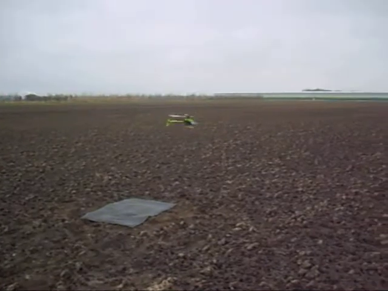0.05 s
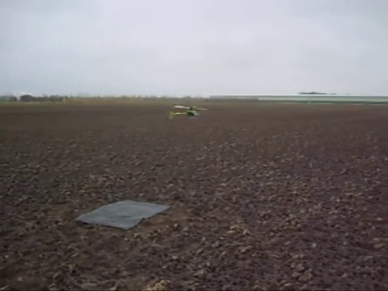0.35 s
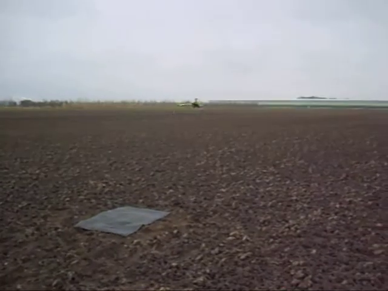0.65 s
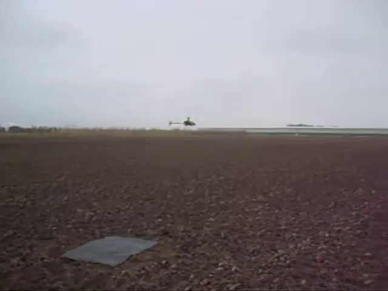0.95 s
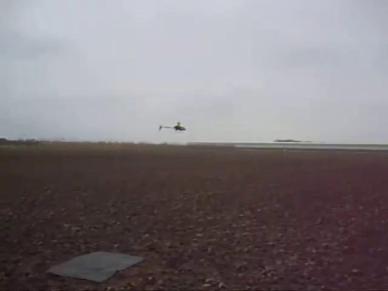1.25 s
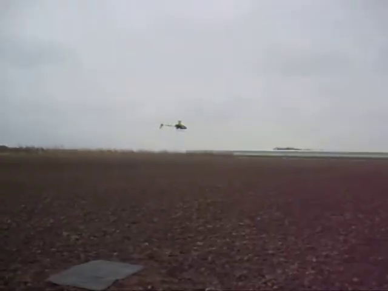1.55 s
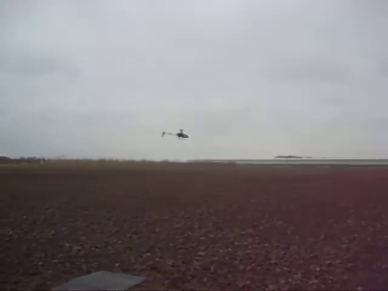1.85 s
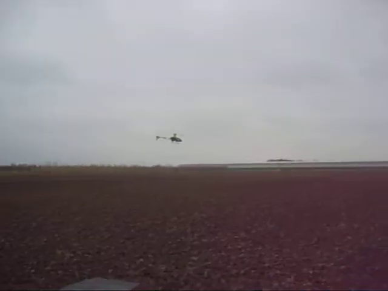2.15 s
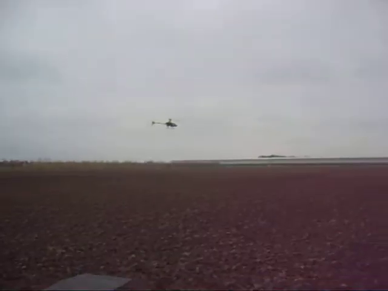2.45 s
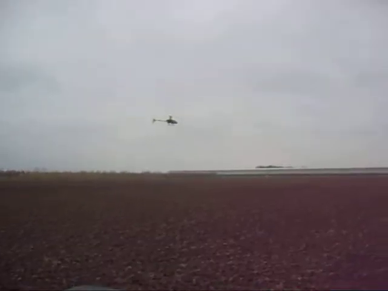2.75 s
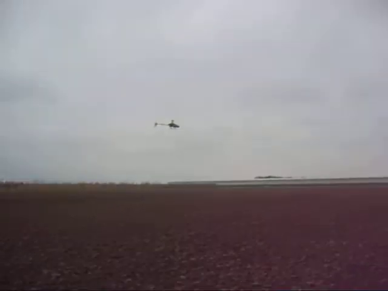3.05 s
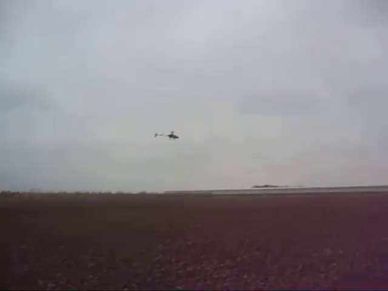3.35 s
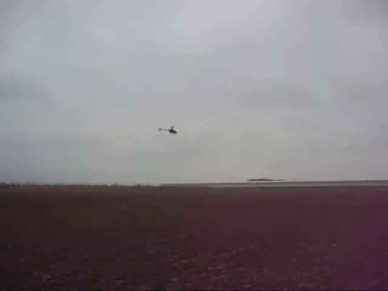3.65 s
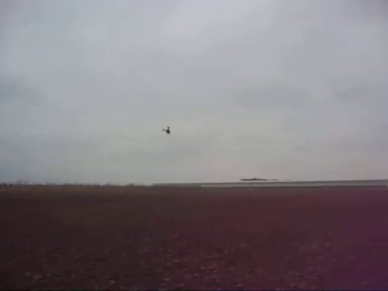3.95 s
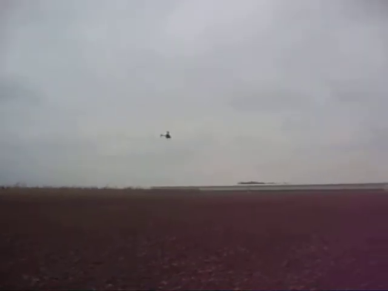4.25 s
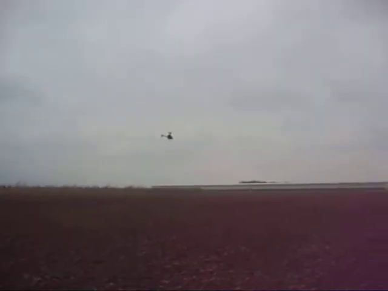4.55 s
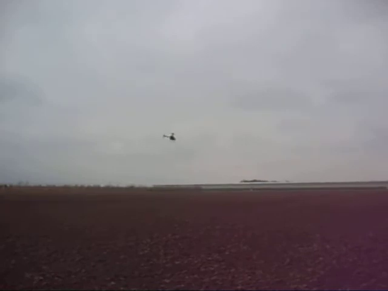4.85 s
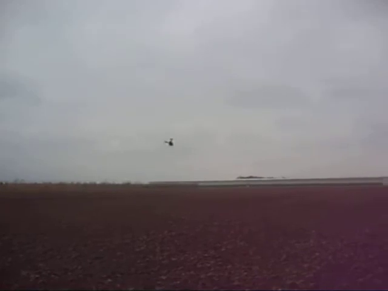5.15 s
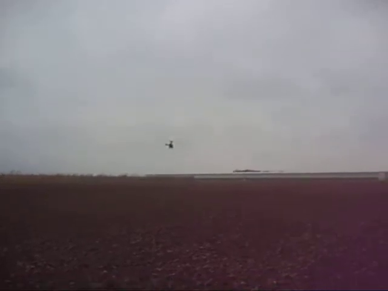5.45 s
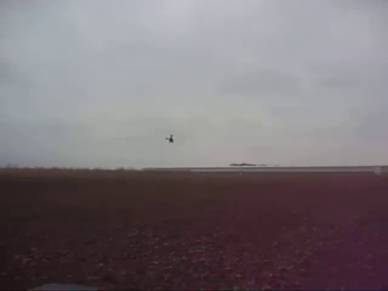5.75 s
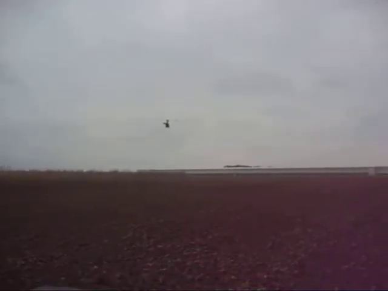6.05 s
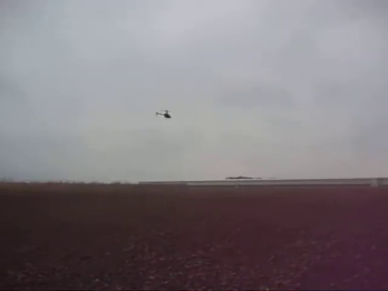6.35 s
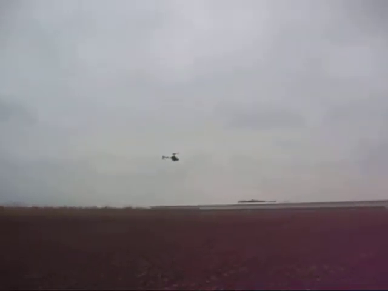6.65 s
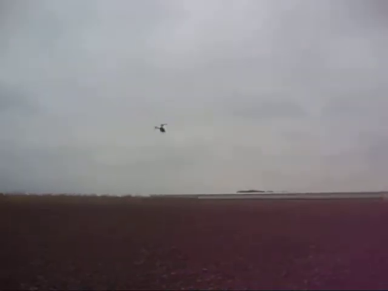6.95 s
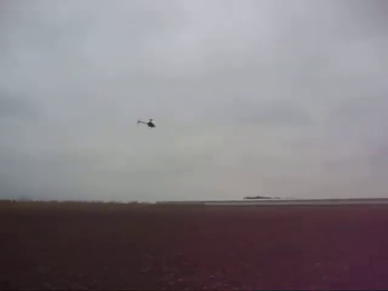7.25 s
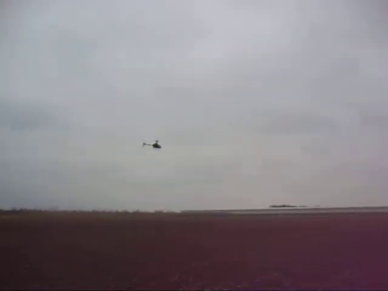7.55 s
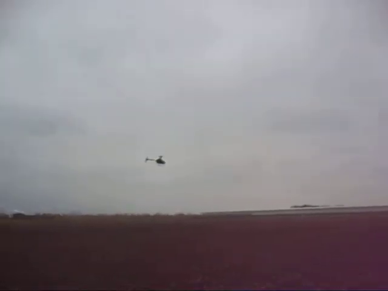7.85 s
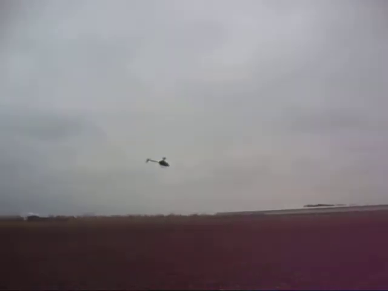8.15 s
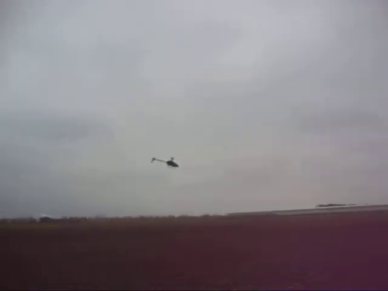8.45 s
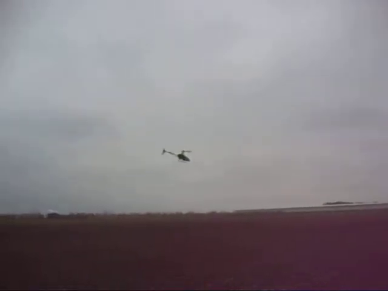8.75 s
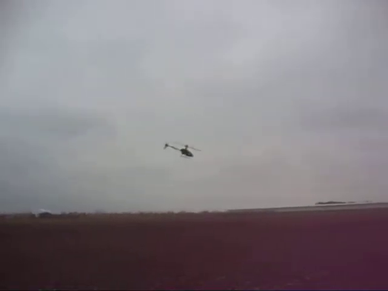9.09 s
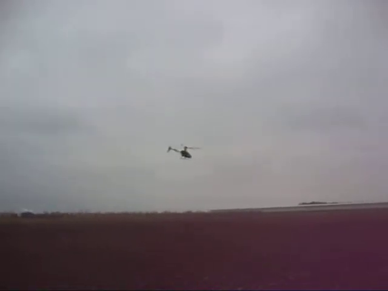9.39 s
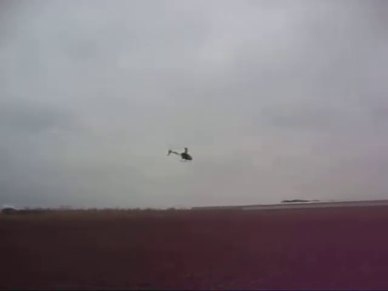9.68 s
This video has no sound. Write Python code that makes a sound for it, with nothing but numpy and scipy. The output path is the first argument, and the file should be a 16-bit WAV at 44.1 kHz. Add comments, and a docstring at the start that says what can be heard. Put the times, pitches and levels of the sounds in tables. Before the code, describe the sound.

A small electric model helicopter flies over an open field, heard fairly quietly through one small microphone with no echo. It starts with a very high whistle that fades by about 1.5 seconds. A layered motor and gear whine rises gently in pitch over the first three seconds, surrounded by a bright hiss of blades and rattling gear teeth. The whine then stays nearly level, wavering and fluttering, while the hiss eases a little from 4 to 7 seconds. Soft, low wind thumps touch the microphone from about 2.8 to 3.8 seconds. A tight cluster of hard thumps near 5 seconds is the loudest event, followed by weaker bumps until 5.7. Near 7 seconds the pitch dips briefly and recovers. From 8 seconds to the end, near 10, the hiss is stronger and a soft, low blade hum reaches its fullest.

```python
"""A small electric model helicopter flies over an open field, heard through one small microphone.
It lifts off with a high whistle; motor, gears and blades sound harmonics of the rotor's turn rate,
so the whole whine rises for three seconds as it spools up, amid tooth rattle and blade hiss.
As it flies about, eddies of wind thump on the microphone, hardest near 5 s.
Near 7 s the pitch dips briefly; after that the hiss and the main blades' hum are at their strongest."""
import sys
import numpy as np
from scipy import signal
from scipy.fft import rfft, irfft, next_fast_len
from scipy.io import wavfile
from scipy.ndimage import uniform_filter1d, map_coordinates

SR = 44100
rng = np.random.default_rng(int(sys.argv[2]) if len(sys.argv) > 2 else 0)


def digitize_waveform(pressure):
    """Quantize a signal to 16-bit integers and store it at the path in sys.argv[1].

    Rows of a 2-D input are taken as channels; values are limited to [-1, 1].
    """
    field = np.atleast_2d(pressure).T
    bounded = np.clip(field, -1, 1)
    quanta = np.round(bounded * 32767).astype(np.int16)
    wavfile.write(sys.argv[1], SR, quanta)


N = 433062
TIME = np.arange(N) / SR


# main rotor speed (time [s], turn rate [Hz])
ROTOR_SPEED = [(0.0, 38.46), (0.38, 38.5), (1.12, 39.98), (1.45, 40.35), (1.89, 41.66), (2.4, 42.15),
               (2.9, 44.16), (3.69, 44.87), (3.88, 44.7), (4.02, 43.97), (4.27, 43.8), (4.87, 44.55),
               (5.39, 44.41), (5.91, 45.1), (6.4, 44), (6.51, 44.54), (6.62, 44.4), (6.73, 45.15),
               (6.81, 44.3), (6.92, 42.75), (7.11, 43.6), (7.38, 43.74), (7.9, 45), (8.07, 45.15),
               (9.11, 44.45), (9.82, 43.9)]
def rotor_turns():
    """Phase is the integral of frequency: the turns made so far, at a slightly unsteady speed."""
    return np.cumsum(curve(ROTOR_SPEED) * (1 + .0002 * walk(14))) / SR


def climbing_load(average_s=0.66, heavy_hz_per_s=2.6):
    """Inertia loads the motor: positive while the rotor gains speed, negative while it coasts down."""
    acceleration = uniform_filter1d(np.gradient(curve(ROTOR_SPEED)) * SR, int(average_s * SR))
    return np.tanh(acceleration / heavy_hz_per_s)


# sidebands of the main gear, stiffened six times a turn by its spokes (order [cycles/turn], level [dB])
SPOKE_TONES = [(128, -63), (133, -74.5), (134, -66.5), (146, -56.5), (152, -63.5)]
# tooth tones of motor, main gear and tail gear octave (order [cycles/turn], level [dB], nearness slope
# [dB/dB], tail effort slope [dB/dB], gain at full load [dB], runout [0-1], lash [rad], flutter [dB])
MESH_TONES = [(69.53, -64, 1.24, -0.7, -1.5, .05, 0.31, 2.5), (140.48, -53.5, 2, -1, 3, 0.18, 0.41, 2),
              (220, -60, 1.05, -0.1, 0.5, .35, 1.2, 2)]
# tail gear's tone, beamed to one side as the machine turns (time [s], level [dB])
TAIL_GEAR = [(.4, -57), (1.3, -46), (3.2, -47.5), (3.9, -50), (4.1, -57), (4.9, -44.5), (5.4, -53.5),
             (6.6, -51), (7.2, -54), (8.1, -48.5), (9.8, -51.5)]
# highest whistle, strong at lift-off (time [s], level [dB])
TOP_WHISTLE = [(0, -41), (.6, -43.5), (1.4, -55)]
def gear_whine(turns, near_db, effort_db, rocking_db=1.36, rocking_hz=9):
    """Meshing teeth force periodic vibration; its directional sound wavers as the machine rocks."""
    load = climbing_load()
    gears = undb(0.77 * near_db) * fading_tones(turns, SPOKE_TONES, runout=0.25, fade_db=7)
    for order, db, by_near, by_effort, load_db, runout, lash, flutter_db in MESH_TONES:
        level_db = db + by_near * near_db + by_effort * effort_db + load_db * load
        level_db += rocking_db * walk(rocking_hz)
        gears += undb(level_db) * mesh(turns, order, runout, lash, flutter_db)
    gears += undb(curve(TAIL_GEAR)) * mesh(turns, order=110, runout=.35, lash=.25, flutter_db=2.3)
    whistle = undb(curve(TOP_WHISTLE)) * mesh(turns, order=274, runout=.7, lash=.9, flutter_db=2)
    return frame_resonance(gears) + whistle


def mesh(turns, order, runout, lash, flutter_db):
    """Modulation makes sidebands: an off-centre gear's load swings once a turn, its timing twice."""
    swing = runout * (1 + np.tanh(walk(2.07)) / 2)
    slip = lash * walk(60) + swing * np.sin(4 * np.pi * turns) / 2
    load = 1 + swing * np.cos(2 * np.pi * turns)
    return tone(turns + slip / (2 * np.pi * order), order) * load * undb(flutter_db * walk(26))


def fading_tones(turns, table, runout, fade_db, fade_hz=10, lash=0.56):
    """Interference with the ground echo, as a random fade of each tone; tooth play jitters the phase."""
    tones = 0
    for order, db in table:
        gain = undb(db + fade_db * np.tanh(walk(fade_hz)))
        tones += gain * tone(turns + lash * walk(50) / (2 * np.pi * order), order)
    return tones * (1 + runout * np.sin(2 * np.pi * turns))


# modes of the frame (frequency [Hz], bandwidth [Hz], boost [dB])
FRAME_MODES = [(2981, 26, 15.5), (3005, 24, 11), (3080, 17, 10), (4460, 64, 2.5), (5620, 81, 7.5),
               (5910, 142, 14), (9858, 200, 9)]
def frame_resonance(x):
    """Resonance: a tone swells as the rotor speed carries it through a mode of the frame."""
    size = next_fast_len(N)
    bins = np.arange(size // 2 + 1) * SR / size
    power = 1 + sum((undb(db) ** 2 - 1) / (1 + (2 * (bins - hz) / width) ** 2)
                    for hz, width, db in FRAME_MODES)
    return irfft(rfft(x, size) * np.sqrt(abs(power)), size)[:N]


# motor shaft's tone (time [s], level [dB])
MOTOR_SHAFT = [(0, -59), (.9, -56), (2.2, -65), (2.6, -72), (3, -65), (6, -76.5), (6.3, -69), (7.4, -59.5),
               (8.2, -69), (9.5, -59)]
# buzz, strongest as the motor pulls the rotor up to speed (time [s], level [dB])
BUZZ_LEVEL = [(0, -63), (.7, -56), (2.7, -59), (4.2, -70), (7, -66.5), (8.8, -57)]
# motor overtones (42, 84) and a faint tail-rotor overtone (30) that swell together as the buzz
# (order [cycles/turn], relative level [dB])
BUZZ_TONES = [(30, -14), (42, -9.5), (84, -1)]
def motor_and_buzz(turns):
    """Gearing multiplies frequency: the motor spins 14 times a turn; motor and tail overtones buzz."""
    shaft = undb(curve(MOTOR_SHAFT)) * tone(turns, order=14)
    buzz = fading_tones(turns, BUZZ_TONES, runout=0.32, fade_db=3, fade_hz=22)
    return shaft + undb(curve(BUZZ_LEVEL)) * buzz


# tail blades' tone (time [s], level [dB])
TAIL_BLADES = [(0, -71.5), (2, -73), (2.4, -69), (4.4, -77), (5.4, -66), (6.1, -66.5), (6.3, -71),
               (8.5, -72), (9.5, -61.5)]
# tail shaft's tone (time [s], level [dB])
TAIL_SHAFT = [(2.3, -82), (2.95, -62.5), (3.6, -64.5), (5.7, -75.5), (6.4, -64.5), (7.2, -71), (8.6, -60.5),
              (9.1, -66), (9.5, -88)]
def tail_rotor(turns):
    """Rotational harmonics: the second and third of a tail rotor that spins 5 times per main turn."""
    blades = undb(curve(TAIL_BLADES)) * tone(turns, order=10)
    return blades + undb(curve(TAIL_SHAFT)) * tone(turns, order=15)


# weaker tones of the drive (order [cycles/turn], level [dB])
SIDE_TONES = [(60, -63.5), (104, -57), (116, -63), (122, -69), (226, -59)]
def side_tones(turns, near_db):
    """Spreading loss: the drive's weaker harmonics grow as the machine comes nearer."""
    return undb(.7 * near_db) * fading_tones(turns, SIDE_TONES, runout=.3, fade_db=4.5)


# air noise contours, each used about its mean (time [s], rush level [dB], wash level [dB])
AIR_NOISE = [(0.06, -48, -57.5), (0.55, -50, -59), (2.55, -51, -64), (2.68, -50.5, -59), (3.52, -49.5, -58),
             (4.09, -54, -61.5), (4.93, -52.5, -60), (5.15, -54, -62), (6.04, -52, -61),
             (6.2, -53.5, -62.5), (6.56, -52, -59), (6.8, -49.5, -58), (6.91, -53.5, -63.5),
             (8.31, -47.5, -58), (9.56, -48, -57.5), (9.78, -48, -58.5)]
def nearness_and_effort():
    """Distance and directivity set the rush (near, side-on); the tail's blade loading sets the wash."""
    rush_db, wash_db = curve(AIR_NOISE), curve(AIR_NOISE, column=2)
    return rush_db - rush_db.mean(), wash_db - wash_db.mean()


# spectrum of the rush (frequency [Hz], relative density [dB])
RUSH_SPECTRUM = [(200, -32), (550, -13), (1200, -11.5), (2200, -10.5), (3000, -5.5), (3800, -7), (4700, -1),
                 (6100, 0), (7100, -2), (8500, -9), (9900, -6), (11500, -7)]
def rush(turns, near_db, level_db=-41.5, chop=0.03):
    """Broadband noise of turbulence and rattling teeth, pulsing as each of the two blades passes."""
    teeth = colour(tooth_rattle(turns), [(1800, -9), (4500, 0)])
    air = 1.2 * rng.standard_normal(N) * undb(1.2 * walk(26))
    pulse = 1 + chop * np.cos(4 * np.pi * turns)
    return undb(level_db + near_db) * colour(teeth + air, RUSH_SPECTRUM) * pulse


def tooth_rattle(turns, max_turns=600, per_turn=1024, memory=.94, second_blade=.35):
    """Repetition makes a comb spectrum: tooth flaws return on every turn, slowly changing."""
    flaws = signal.lfilter([1], [1, -memory], rng.standard_normal((max_turns, per_turn)), axis=0).ravel()
    now, half_turn_on = (map_coordinates(flaws, [(turns + start) * per_turn], order=1)
                         for start in (20, 20.5))
    # two blades load the drive alike, which favours the even lines
    return unit(now + second_blade * half_turn_on)


def tail_wash(turns, effort_db, level_db=-63.5, growth=3, spread_hz=75):
    """Blade-wake interaction: the tail chops the main rotor's wake into smeared blade-rate harmonics."""
    wash = 0
    for k in range(2, 8):
        angle = 2 * np.pi * 10 * k * turns
        smear_hz = spread_hz * k / 2
        wash += walk(smear_hz) * np.cos(angle) + walk(smear_hz) * np.sin(angle)
    return undb(level_db + growth * effort_db) * unit(wash)


# main blades' hum, growing as they bite (time [s], level [dB])
BLADE_HUM = [(0, -84), (4.3, -75), (6, -73), (8.2, -65), (9.8, -65)]
# harmonics of that hum (order [cycles/turn], relative level [dB])
BLADE_TONES = [(2, -3.5), (3, -3.5), (4, -7.5), (5, -8), (6, -7.5), (8, -15)]
def blade_hum(turns):
    """Loading noise: the main blades push the air periodically, at low harmonics of the turn rate."""
    harmonics = sum(undb(db + walk(1.5)) * tone(turns, order) for order, db in BLADE_TONES)
    return undb(curve(BLADE_HUM)) * unit(harmonics)


# strongest eddies at the microphone (time [s], peak level [dB], thump frequency [Hz])
STRONG_EDDIES = [(2.831, -45, 204), (3.202, -38.5, 161), (3.844, -46.5, 174), (4.837, -20.5, 281),
                 (4.859, -27, 269), (4.976, -25, 520), (4.992, -23.5, 332), (5.02, -23.5, 204),
                 (5.027, -21, 346), (5.038, -26.5, 496), (5.162, -39, 135)]
def wind_thumps(rumble_db=-5, linger_s=0.063, flutter_db=-13, flutter_s=0.0085):
    """Turbulent pressure: each eddy is one suck and push, within a quick flutter and a longer rumble."""
    thumps, rumble_power, flutter_gain = np.zeros((3, N))
    for s, db, hz in STRONG_EDDIES + small_eddies():
        near = slice(int((s - .3) * SR), int((s + .3) * SR))
        lag = TIME[near] - s
        phase = 2 * np.pi * hz * lag
        thumps[near] += undb(db) * phase * np.exp((1 - phase ** 2) / 2)
        flutter_gain[near] += undb(db + flutter_db) * np.exp(-abs(lag) / flutter_s)
        # slow, large eddies carry the most turbulence
        rumble_power[near] += (undb(db + rumble_db) * (80 / hz) ** 2 * np.exp(-abs(lag) / linger_s)) ** 2
    rumble = colour(rng.standard_normal(N), [(20, -8), (60, 10.5), (200, -3.5), (400, -23), (1500, -25)])
    flutter = colour(rng.standard_normal(N), [(300, 11), (800, -10), (2000, -30)])
    return thumps + np.sqrt(rumble_power) * rumble + flutter_gain * flutter


# gusts of wind (start [s], end [s], typical eddy peak [dB])
GUSTS = [(2.601, 2.95, -61), (3.15, 3.38, -45.5), (3.5, 3.76, -48.5), (5.069, 5.28, -45), (5.47, 5.72, -47),
         (7.98, 8.06, -52.5)]
def small_eddies(count=16, per_s=18, pitch_hz=128, spread_db=2.5, spread_octaves=0.45):
    """Eddy shedding: each gust breaks into eddies of scattered timing, strength and pitch."""
    eddies = []
    for start, end, db in GUSTS:
        for k, (late, strong, high) in enumerate(rng.standard_normal((count, 3))):
            s = start + (k + late / 4) / per_s
            if s < end:
                eddies.append((s, db + spread_db * strong, pitch_hz * 2 ** (spread_octaves * high)))
    return eddies


# spectrum of the open air (frequency [Hz], relative density [dB])
FIELD_SPECTRUM = [(20, -4.5), (100, -0.5), (1000, -25.5), (4000, -42)]
def open_field(level_db=-69.0):
    """Ambient noise: faint and steady, with most of its power at low frequencies."""
    return undb(level_db) * colour(rng.standard_normal(N), FIELD_SPECTRUM)


def undb(db):
    """Decibels to gain."""
    return np.exp(np.asarray(db) * (np.log(10) / 20))


def curve(table, column=1):
    """Linear interpolation of one column in time."""
    rows = np.array(table, float)
    return np.interp(TIME, rows[:, 0], rows[:, column])


def unit(x):
    """Scale to rms 1."""
    return x / np.sqrt(np.mean(x ** 2))


def colour(x, spectrum):
    """Filter x by points of (frequency [Hz], gain [dB]); rms 1."""
    size = next_fast_len(N)
    hz, db = np.transpose(spectrum)
    bins = np.maximum(np.arange(size // 2 + 1) * SR / size, 1)
    gain = undb(np.interp(np.log(bins), np.log(hz), db))
    return unit(irfft(rfft(x, size) * gain, size)[:N])


def walk(rate, count=8192):
    """Smooth random wandering with about `rate` new values a second; rms 1."""
    steps = np.interp(TIME * rate, np.arange(count), rng.standard_normal(count))
    return unit(uniform_filter1d(steps, max(int(SR / rate / 2), 1)))


def tone(turns, order):
    """A sine of rms 1 locked to the rotor; `order` is rounded to whole cycles a turn."""
    return np.sqrt(2) * np.cos(2 * np.pi * (round(order) * turns + rng.random()))


def scene():
    """Superposition of helicopter, wind and open air; no walls, so no reverberation."""
    turns = rotor_turns()
    near_db, effort_db = nearness_and_effort()
    whine = gear_whine(turns, near_db, effort_db) + motor_and_buzz(turns) + tail_rotor(turns)
    whine += side_tones(turns, near_db)
    air = rush(turns, near_db) + tail_wash(turns, effort_db)
    return np.tile(whine + air + blade_hum(turns) + open_field() + wind_thumps(), (2, 1))


def record(dry, sample_hz=22050, edge_hz=10900, top_hz=12300):
    """Aliasing: a low-rate recorder mirrors tones near half its rate; then the top is cut."""
    lowpass = signal.firwin(43, edge_hz, fs=SR)[None]
    step = round(SR / sample_hz)
    sampled = signal.fftconvolve(dry, lowpass, "same", axes=1) * step * (np.arange(N) % step == 0)
    smoothed = signal.fftconvolve(sampled, lowpass, "same", axes=1)
    return signal.sosfilt(signal.ellip(10, .1, 80, top_hz, fs=SR, output="sos"), smoothed)


dry = scene()
out = record(dry)
digitize_waveform(out)
```